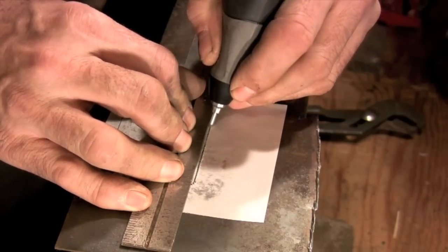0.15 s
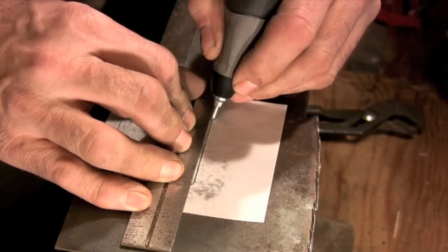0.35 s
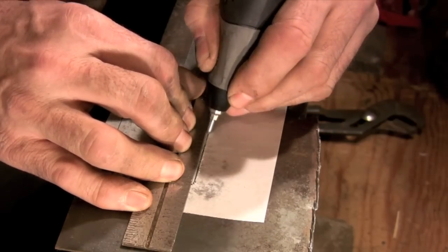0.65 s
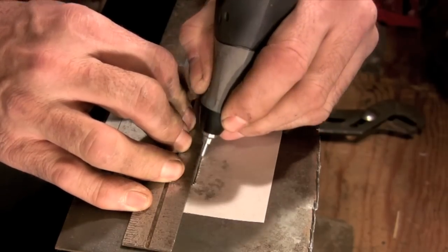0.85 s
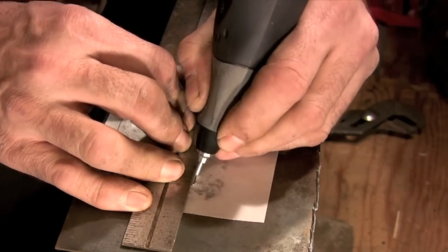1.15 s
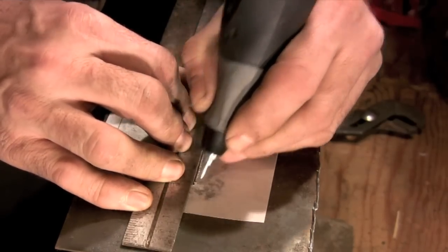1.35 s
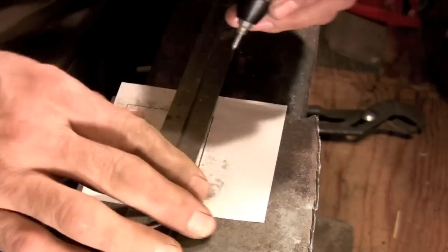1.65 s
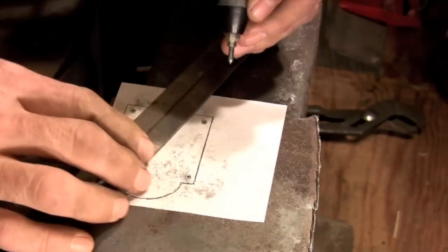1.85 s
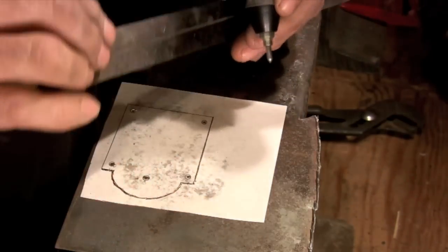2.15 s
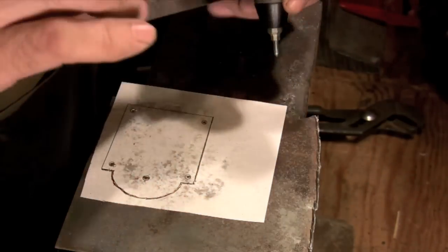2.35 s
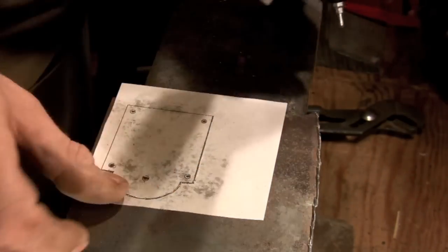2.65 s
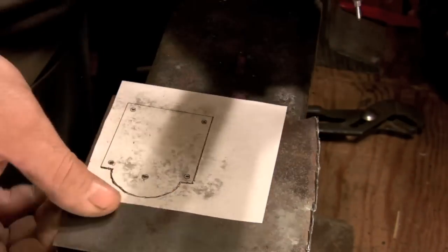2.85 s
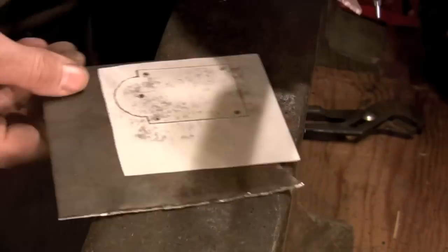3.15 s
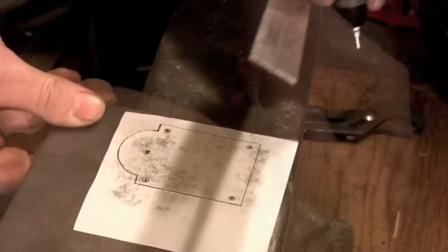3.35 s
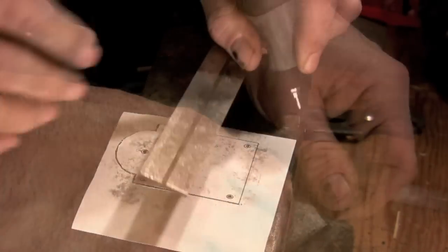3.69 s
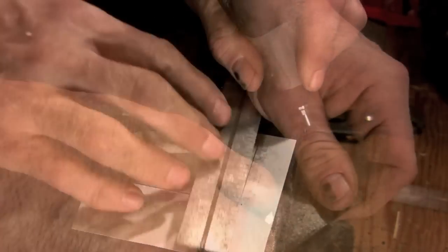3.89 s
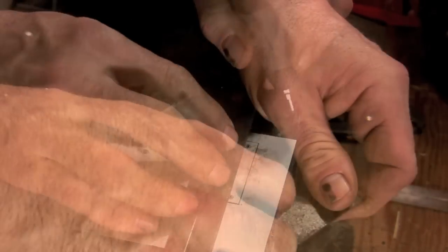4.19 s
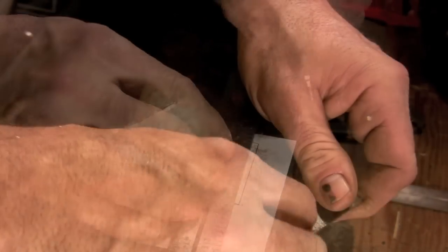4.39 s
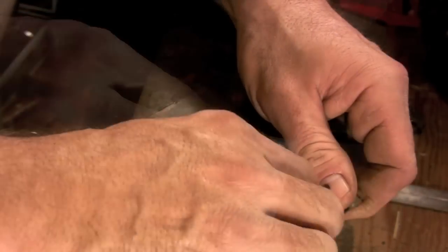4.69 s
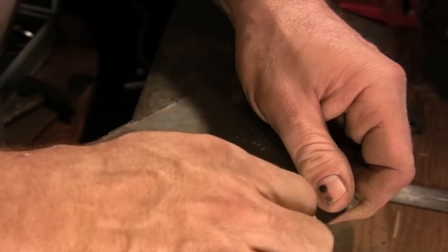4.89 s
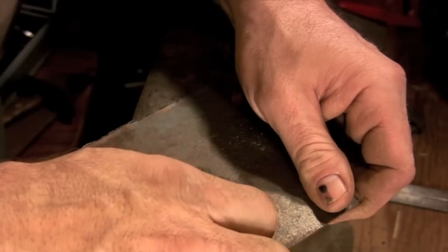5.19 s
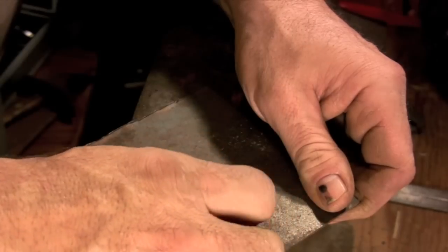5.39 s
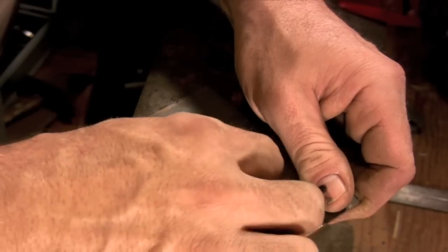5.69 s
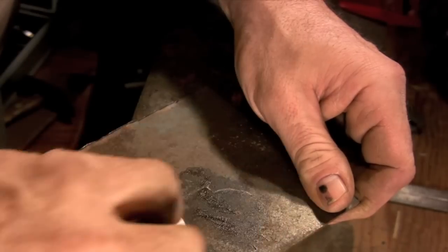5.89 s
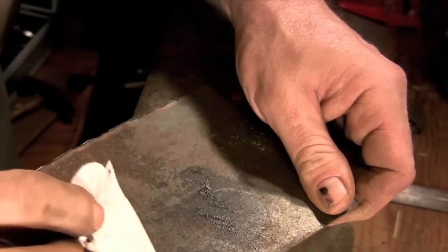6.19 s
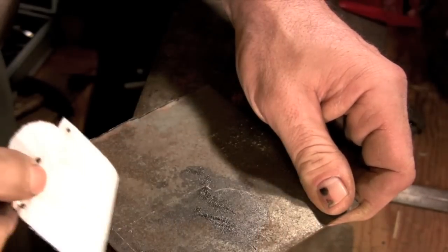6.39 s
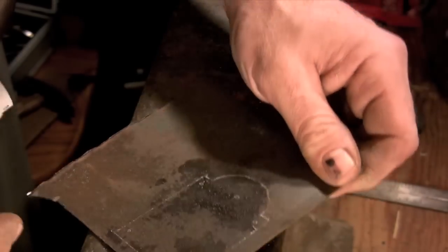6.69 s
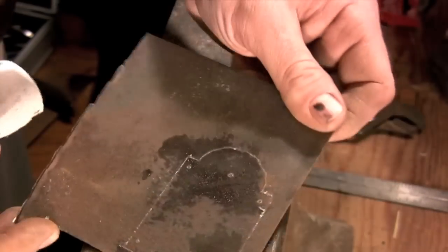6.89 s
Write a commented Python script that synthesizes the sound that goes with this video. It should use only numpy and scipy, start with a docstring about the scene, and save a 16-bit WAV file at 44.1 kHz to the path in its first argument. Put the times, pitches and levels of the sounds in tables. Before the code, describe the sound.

Close, fairly dry workshop sound. From 0 s an electric engraving tool hammers on thin sheet metal, a harsh raspy buzz at about 120 strokes a second, swelling until a bright steel click at 0.6 s. It then bears down harder, shriller and ringing, with a small sheet shift near 0.9 s, until 1.4 s. Lifted, it turns into a looser, fuller rattling buzz with a strong hum, its tone drifting as the grip changes. From about 2.9 s it fades steadily, gone by 5.1 s, while a soft low fan rush swells and stays. A faint touch comes at 3.9 s and a sharp steel click at 4.95 s. In the quiet, light taps follow from 5.4 s, a small clink at 6.0 s, fine papery peeling hiss from 5.8 to 6.4 s and again 6.6 to 6.9 s, with soft knocks. A short gritty metal scrape and tap end it around 7 s.

```python
"""In a workshop, a mains-driven engraving pencil hammers along a steel ruler on thin sheet metal, bears
down, then is lifted and rattles in the air: impulse trains ring metal modes over a hum of their orders.
Its buzz fades as the fan, coloured noise with weak tones, swells to a steady rush. Steel clicks as noise
cracks with ringing sines; a paper template is picked at and peeled off as grainy hiss with light taps.
The sheet shifts under the tip and later scrapes over the bench, uneven noise ringing its modes."""
import sys
import numpy as np
from scipy import signal
from scipy.fft import rfft, irfft, next_fast_len
from scipy.io import wavfile
from scipy.ndimage import uniform_filter1d, map_coordinates

SR = 44100
rng = np.random.default_rng(int(sys.argv[2]) if len(sys.argv) > 2 else 0)


def store_wav(level_fs):
    """Save 16-bit WAV to argv[1]."""
    pcm = np.round(np.clip(np.atleast_2d(level_fs), -1, 1) * 32767)
    wavfile.write(sys.argv[1], SR, pcm.T.astype(np.int16))


N = 310464

STROKE_HZ, FIRST_STROKE_S = 119.986, .0053

# hum of each hold of the tool: (multiple of the stroke rate, level against the clatter [dB])
HUM_TRACING = [(1, -39.5), (2, -26), (3, -27.5), (4, -15.5), (5, -24), (6, -38), (8, -22.5), (9, -40),
               (10, -14), (11, -22), (12, -27), (13, -22), (14, -23), (16, -21), (17, -16), (18, -23),
               (19, -16), (20, -30), (21, -34), (24, -16), (30, -19)]
HUM_BEARING = [(2, -23), (3, -31), (4, -17), (5, -31.5), (6, -20), (8, -9.5), (10, -14.5), (11, -21),
               (12, -20), (13, -14), (14, -17.5), (16, -21.5), (17, -23), (18, -19), (19, -16), (20, -18.5),
               (21, -21.5), (22, -19.5)]
HUM_LIFTED = [(2, -39), (3, -24), (4, -13), (5, -18), (6, -21), (7, -20), (8, -21.5), (9, -19), (10, -15.5),
              (12, -23.5), (13, -18), (15, -24.5), (16, -21.5), (17, -22.5), (18, -24), (19, -31),
              (20, -21.5), (21, -26), (28, -24), (33, -18)]
HUM_RAISED = [(3, -24.5), (4, -15), (5, -17.5), (6, -20.5), (7, -21.5), (8, -24), (9, -28), (10, -17),
              (11, -26), (12, -23), (13, -12.5), (14, -25), (15, -25), (16, -20.5), (17, -17), (18, -24.0),
              (20, -20.5), (21, -32), (24, -27), (25, -32), (26, -20.5), (30, -35), (32, -23), (33, -17),
              (34, -25), (36, -30), (40, -32)]
# tracing, bearing, lifted, raised: (hum table, unsteadiness of its phase [radians per order])
HUMS = {"tracing": (HUM_TRACING, 0.014), "bearing": (HUM_BEARING, 0.026), "lifted": (HUM_LIFTED, 0.042),
        "raised": (HUM_RAISED, 0.041)}
# the grip moves the housing's main resonance and sets its low hum:
# (time [s], centre [Hz], lift before each source's share [dB], low hum [dB])
GRIP = [(0, 1380, 2.5, -4), (.6, 1280, -2, -1.5), (.85, 1250, 6.5, 1), (.92, 1300, 4, 0),
        (1.05, 1450, -2.5, 1.5), (1.28, 1610, 7, 2), (1.43, 1460, 1.5, -1), (1.75, 1410, 5.5, 2.5),
        (2.02, 1170, 1.5, 0.5), (2.25, 1150, 0.5, -0.5), (2.5, 1270, 4.5, 0), (2.849, 1700, 8.5, 2.5),
        (3.2, 1750, 8, 1.5), (3.55, 1830, 7, 1), (3.85, 1300, 6.5, -0.5), (4.9, 1120, 7.5, 1)]
# spectrum of steel cracking on a hard surface: (frequency [Hz], level [dB])
CLICK_COLOUR = [(180, -51), (300, -10), (847, -4), (1450, -8), (2100, 0.5), (2550, -7), (4360, -3.5),
                (5390, -15), (7100, -3), (10500, -8), (14500, -30)]
# modes of the thin sheet: (frequency [Hz], width [Hz], relative level [dB])
SHEET = [(966, 28, 4), (1100, 75, -9), (1380, 36, 7.5), (1670, 24, 6), (2100, 90, -18), (2450, 100, 1.5),
         (2810, 51, 1), (3110, 88, 0.5), (3560, 280, -9), (4440, 120, -4), (5000, 140, -4), (5600, 90, -1),
         (6900, 300, -17), (8100, 210, -10)]
# hands, ruler and paper tapping the sheet: (time [s], relative knock [dB], relative rattle [dB],
# relative tick [dB], mode that the spot favours [Hz], mode level [dB], hard contact level [dB],
# rise [s], nominal decay [s])
TAPS = [(3.903, -28, -41, -52, 606, -32, -40, 0.0047, 0.14),
        (5.406, -36, -36, -41, 3150, -40, -47, 0.019, 0.1),
        (5.51, -65, -52, -48, 3900, -48, -44, 0.0077, 0.11),
        (5.767, -38, -36.5, -37.5, 2250, -44, -29, 0.02, 0.14),
        (5.893, -44, -48, -51, 1500, -46, -40, .003, .05),
        (5.9964, -31.5, -28, -43, 2090, -26, -23, 0.00049, 0.085),
        (6.012, -39, -49, -52, 1400, -37, -39, 0.0018, .13),
        (6.361, -30, -48, -47, 388, -26.5, -30, 0.00068, .035),
        (6.37, -41, -44, -40, 1000, -39, -30, 0.00089, 0.073),
        (6.4009, -27.5, -55, -62, 990, -29, -36, 0.00044, 0.044),
        (6.594, -39, -47, -45, 1300, -50, -39, 0.011, 0.48),
        (6.664, -38, -36, -60, 800, -34, -30, 0.0092, 0.19),
        (6.73, -48, -42, -47, 280, -26, -35, 0.012, .1),
        (7.012, -32.5, -36, -47, 1420, -36, -27.5, 0.0042, 0.044)]


def amp(db):
    """Decibels to gain."""
    return np.exp(np.asarray(db) * np.log(10) / 20)


def unit(x):
    """Scaled to rms 1."""
    return x / np.sqrt(np.mean(x ** 2) + 1e-20)


def clock():
    """The time of each sample, in seconds."""
    return np.arange(N) / SR


def gain(points, hz):
    """Gain of (Hz, dB) points on a log axis, falling away beyond both ends."""
    f, db = np.transpose(points)
    outside = np.minimum(1, hz / f[0]) ** 2 * np.minimum(1, f[-1] / (hz + 1)) ** 2
    return amp(np.interp(np.log(hz + 1), np.log(f), db)) * outside


def curves(rows):
    """One value per sample for each column after the time."""
    s, *cols = np.transpose(rows)
    return [np.interp(clock(), s, c) for c in cols]


def wobble(rate):
    """A smooth random curve, rate knots a second."""
    knots = rng.standard_normal(int(N * rate / SR) + 4)
    coarse = np.linspace(0, N / SR, 2 ** 11)
    return np.interp(clock(), coarse, map_coordinates(knots, [coarse * rate]))


def filtered(x, response):
    """x times a response of frequency."""
    m = next_fast_len(N + SR // 4, True)
    spectrum = rfft(x, m) * response(np.fft.rfftfreq(m, 1 / SR))
    return irfft(spectrum, m)[..., :N]


def coloured(x, points):
    """x shaped by the spectrum of (Hz, dB) points."""
    return filtered(x, lambda hz: gain(points, hz))


def causal(gains):
    """The response with these gains that rings only after the blow (minimum phase)."""
    cepstrum = irfft(np.log(gains + 1e-6))
    half = len(cepstrum) // 2
    fold = np.r_[1, np.full(half - 1, 2), 1, np.zeros(half - 1)]
    return np.exp(rfft(cepstrum * fold))


def resonate(x, table):
    """x rung through (Hz, width, dB) modes of alternating sign, at rms 1."""
    def modes(f):
        total = 0
        for k, (centre, width, db) in enumerate(table):
            damping = 1j * f * width
            total = total + (-1) ** k * amp(db) * damping / (centre ** 2 - f * f + damping)
        return total
    return unit(filtered(x, modes))


def noise():
    """Two unrelated white noises, for mid and side."""
    return rng.standard_normal((2, N))


def stereo(pair, width):
    """Left and right from a mid and a side signal."""
    side = coloured(pair[1], width)
    return np.array([pair[0] + side, pair[0] - side])


def blow(s, rise, t60):
    """An envelope that rises at s and then dies away."""
    age = np.maximum(clock() - s, 0)
    decay = amp(-60 * np.clip(age - rise, 0, 2 * t60) / t60)
    return np.minimum(age / rise, 1) * decay


def swell(start, end, attack, release, db, growth_db):
    """A gesture: it rises, holds while its level changes steadily, and is released after its end."""
    age = clock() - start
    gate = np.clip(age / attack, 0, 1) * np.clip(1 - (clock() - end) / release, 0, 1)
    return gate * amp(db + growth_db * np.clip(age, 0, end - start))


def faded():
    """Progress of the fade from tool to fan, 0 to 1."""
    start_s, end_s = 2.94, 5.13
    return np.clip((clock() - start_s) / (end_s - start_s), 0, 1)


def strokes(contacts, jitter, scatter_db, limp_db):
    """One impulse for each contact of each stroke; the two mains half-waves pull unequally."""
    k = np.arange(int(N / SR * STROKE_HZ))
    train = np.zeros(N + SR)
    for delay, db in contacts:
        slack = rng.standard_normal(len(k)) + wobble(5)[k * N // len(k)]
        at = ((k + delay) / STROKE_HZ + FIRST_STROKE_S + jitter * slack) * SR
        size = amp(db + scatter_db * rng.standard_normal(len(k)) + limp_db * (-1) ** k)
        # a short sinc places each impulse between samples
        cells = at.astype(int)[:, None] + np.arange(-4, 6)
        pulses = size[:, None] * np.sinc(cells - at[:, None])
        train += np.bincount(np.abs(cells).ravel(), pulses.ravel(), N + SR)
    return train[:N]


def clatter(contacts, colour, modes, jitter, scatter_db, crack_t60, tail_db, tail_t60,
            rasp_db, snap_db, turn):
    """Strokes open with a bare snap; contacts crack, ring dense metal modes and scratch puffs of noise."""
    # the irregular rasp, and the ring that repeats: (frequency [Hz], level [dB])
    rasp_colour = [(150, -33), (500, -7), (1000, -6.5), (2000, 0), (4000, -0.5), (10000, 1.5)]
    ring_colour = [(1700, -48), (2500, -2), (5000, -2.5), (12000, 0)]
    train = strokes(contacts, jitter, scatter_db, limp_db=-0.4)
    t = np.arange(SR // 6) / SR
    attack = np.minimum(1, (t + 1 / SR) / .0001)
    decay = attack * np.hypot(amp(-60 * t / crack_t60), amp(tail_db - 60 * t / tail_t60))

    def dense_ring():
        modes_cloud = decay * rng.choice([-1, 1], (2, len(t)))
        return signal.oaconvolve(train[None], modes_cloud, axes=1)[:, :N]

    # the modes change as the tool moves, turn radians a second
    drift = turn * clock() + 0.36 * wobble(2.01)
    ring = unit(dense_ring() * np.cos(drift) + dense_ring() * np.sin(drift))
    # every scratch has new detail but carries the energy of its blow
    energy = np.abs(signal.oaconvolve(train ** 2, decay ** 2)[:N])
    rasp = unit(np.sign(noise()) * np.sqrt(energy))
    first_contacts = unit(strokes(contacts[:1], jitter, scatter_db, limp_db=0))
    snap = -amp(snap_db) * first_contacts * np.array([[1], [0]])  # in the middle only

    def body(f):
        lift_db = sum(db / (1 + (2 * (f - hz) / width) ** 2) for hz, width, db in modes)
        return causal(gain(colour, f) * amp(lift_db))

    mix = coloured(ring + snap, ring_colour) + amp(rasp_db) * coloured(rasp, rasp_colour)
    return unit(filtered(mix, body))


def hum(force, wander_db):
    """Clean orders of the stroke rate follow the force; each hold favours its own orders."""
    # one order swells or dips as the grip tunes the housing:
    # (order, time [s], width [s], change at its middle [dB])
    resonances = [(19, 0.27, .15, 4), (19, 0.97, 0.18, -6), (12, .93, 0.094, 7), (13, 1.2, 0.065, 4),
                  (11, 1.24, 0.13, 4), (10, 2.08, 0.3, 5.5), (17, 2.93, 0.16, 4), (16, 3.35, .25, 3),
                  (10, 3.69, 0.12, 5)]
    free_lag_s, loosen_s = 0.00113, .4  # in the air the housing peaks this long after the blow
    share = force / (force.sum(0) + 1e-6)
    tables = [{round(k): amp(db) for k, db in table} for table, _ in HUMS.values()]
    unsteady = np.array([spread for _, spread in HUMS.values()]) @ share
    free = uniform_filter1d(share[2:].sum(0), int(loosen_s * SR))  # 0 on the sheet, 1 in the air
    phase = 2 * np.pi * STROKE_HZ * (clock() - FIRST_STROKE_S - free_lag_s * free)
    low_gain = amp(curves(GRIP)[-1])
    out = np.zeros(N)
    for k in sorted(set().union(*tables)):
        size = np.array([table.get(k, 0) for table in tables]) @ force
        if k <= 8:
            size = size * low_gain
        tuned_db = sum(db * np.exp(-((clock() - s) / width) ** 2)
                       for order, s, width, db in resonances if round(order) == k)
        wandering_db = wander_db * np.sqrt(k) * wobble(5.035)
        # orders stay loosely in step with the blow
        lag = rng.uniform(-0.65, 1.27) + k * unsteady * wobble(9)
        out += np.sqrt(2) * size * amp(tuned_db + wandering_db) * np.cos(k * phase + lag)
    return out


def gripped(x, share):
    """x through the moving resonance of the housing, with a share of its lift in dB."""
    width_hz = 370
    hz, t, z = signal.stft(x, SR, nperseg=512)
    s, *cols = np.transpose(GRIP)
    centre, lift_db, _ = (np.interp(t, s, c) for c in cols)
    bell = 1 / (1 + (2 * (hz[:, None] - centre) / width_hz) ** 2)
    return signal.istft(z * amp(share * lift_db * bell), nperseg=512)[1][:N]


def singing():
    """Strokes or their rebound ring narrow modes for a while: the pressed sheet, the lifted tool's casing."""
    # (frequency [Hz], width [Hz], delay [cycles], start [s], end [s], attack [s], release [s],
    # level [dB], growth [dB per s])
    modes = [(3150, 110, 0, 0.94, 1.408, 0.3, 0.029, -25, -4),
             (4300, 77, 0.066, 0.76, 0.96, 0.054, .08, -30.5, -4),
             (4770, 110, .45, .98, 1.408, 0.14, 0.022, -25, -5),
             (4330, 180, 0, 1.36, 1.408, .04, 0.032, -27, 0), (4700, 130, 0, 1.46, 1.85, .08, .08, -34, -4),
             (4550, 120, 0, 3.3, 4.9, 0.25, .08, -30, -3.5)]
    out = np.zeros(N)
    for hz, width, delay, *gesture in modes:
        train = strokes([(delay, 0)], jitter=.00003, scatter_db=2, limp_db=.4)
        out += swell(*gesture) * resonate(train, [(hz, width, 0)])
    return out


def engraver():
    """The armature strikes twice per mains cycle: crisp on the sheet, loose and rattling in the air."""
    # how the tool is held: (hold, start [s], end [s], attack [s], release [s], level [dB],
    # growth [dB per s])
    holds = [("bearing", -.05, 0.023, .02, 0.5, -24, 0), ("tracing", -0.032, 0.592, .02, 0.09, -28, 12.3),
             ("bearing", 0.56, 1.408, 0.14, 0.044, -22, 2.7), ("lifted", 1.4, 1.49, .04, 0.11, -22, 0),
             ("lifted", 1.494, 2.45, 0.095, 0.29, -19.5, 0), ("raised", 2.45, 3.39, 0.3, 0.38, -18.5, 0),
             ("lifted", 3.364, 4.98, 0.38, 0.09, -19, 0)]
    # contacts within one stroke: (delay [cycles], relative level [dB])
    tracing_contacts = [(-.012, 0), (.03, -4), (.13, -10), (.28, -10)]
    bearing_contacts = [(-.025, -6), (.04, 6.5), (.47, -0.5), (.58, -8)]
    lifted_contacts = [(.005, -4.5), (.045, -2.5), (.14, -6.5), (.335, -3.5), (.84, -3.5)]
    # colour of the clatter in each hold: (frequency [Hz], level [dB])
    tracing_colour = [(410, -50), (700, -33), (902, -19), (986, -4), (1130, -1), (1180, -11), (1620, -7),
                      (1770, -10), (2220, -4), (2750, -10), (2970, -4.5), (7400, -4), (8410, -3),
                      (11000, -10.5), (14500, -28)]
    bearing_colour = [(700, -21), (1000, -1), (1600, -5.5), (2700, -11), (3300, -6.5), (3800, -5.5),
                      (4600, -3), (5500, -6.5), (6600, -8), (8000, -13), (9700, -13), (12900, -25),
                      (14500, -45)]
    lifted_colour = [(410, -9), (700, -8), (775, -3), (815, -5), (902, -7), (937, -1.5), (1130, -2.5),
                     (1180, -5.5), (1270, -2), (1520, -4), (1660, -4.5), (2750, -7.5), (3830, -3.5),
                     (9910, -9.5), (12500, -18), (14500, -26)]
    # resonances along the ruler, bearing down, and of the tool's own casing:
    # (frequency [Hz], width [Hz], lift [dB])
    ruler_modes = [(2150, 400, 3), (3000, 160, 0), (4850, 260, 3.5), (8250, 250, 3), (9300, 300, 2)]
    pressed_modes = [(2250, 240, 5), (3150, 300, 7.5), (4280, 160, 5), (4800, 280, 2)]
    casing_modes = [(2060, 1600, 2), (3120, 320, 1.5), (3990, 190, 2.5), (4690, 270, 3.5),
                    (5630, 350, -0.5), (6520, 360, 3), (10220, 5200, 5.5)]
    # the loose armature's low flutter: (frequency [Hz], level [dB])
    flutter_colour = [(125, -41), (150, -8), (190, -26), (300, -9.5), (420, -6), (540, 0.5), (680, -15.5),
                      (900, -6.5), (1400, -10)]
    # stereo width of the clatter: (frequency [Hz], side gain [dB])
    rattle_width = [(60, 2), (200, -44), (500, -13), (1300, -15.5), (2500, -89), (4500, -31.5),
                    (6500, -12.5), (8000, -9), (10000, -9.5), (14000, -72)]
    idle_rattle_db = -29  # the casing rattles a little even with the tip on the sheet

    force = np.array([sum(swell(*row) for kind, *row in holds if kind == hold) for hold in HUMS])
    # jitter and decay times in seconds, turn in radians a second
    tracing = clatter(tracing_contacts, tracing_colour, ruler_modes, jitter=.000022, scatter_db=1.5,
                      crack_t60=0.0012, tail_db=-25.5, tail_t60=0.26, rasp_db=5, snap_db=-4, turn=4.5)
    bearing = clatter(bearing_contacts, bearing_colour, pressed_modes, jitter=.00003, scatter_db=2.0,
                      crack_t60=0.0011, tail_db=-19, tail_t60=0.16, rasp_db=-1, snap_db=-13, turn=7.9)
    lifted = clatter(lifted_contacts, lifted_colour, casing_modes, jitter=.000025, scatter_db=1.2,
                     crack_t60=0.0018, tail_db=-19.5, tail_t60=0.19, rasp_db=0.5, snap_db=-10.5,
                     turn=4.476)
    loose = np.maximum(force[2] + force[3], amp(idle_rattle_db))
    metal = force[0] * tracing + force[1] * bearing + loose * lifted
    flutter_level = amp([-28, -24.5, -21.5, -20.5]) @ force  # dB in each hold
    flutter = flutter_level * unit(coloured(noise(), flutter_colour))
    # the clatter gets a smaller share of the grip's lift than the hum
    rattle = np.array([gripped(part, 0.52) for part in metal]) + flutter
    buzz = gripped(hum(force, wander_db=0.52), 0.85)
    return (1 - faded()) * (stereo(rattle, rattle_width) + buzz + singing())


def fan():
    """A workshop fan: low rush, a duct resonance and weak unsteady tones, swelling as the tool fades."""
    # low rush, and the duct's band above it: (frequency [Hz], level [dB])
    low_colour = [(15, -50), (25, -20), (123, -7.5), (183, -9), (234, 0.5), (329, -9.5), (367, -4.5),
                  (415, -17), (469, -10), (515, -13), (712, -18), (857, -40), (1000, -6), (1300, -32),
                  (2200, -120)]
    duct_colour = [(700, -6.5), (950, -5), (1130, 1.5), (1450, -15), (2200, -19), (5000, -22),
                   (10500, -23.5), (14000, -43)]
    # unsteady tones: (frequency [Hz], relative level [dB])
    lines = [(59.2, -61), (118.4, -50), (150.7, -49), (209.9, -57), (360.7, -62)]
    # stereo width: (frequency [Hz], side gain [dB])
    rush_width = [(60, -11), (110, 2.5), (200, -7), (380, -4.5), (690, -4), (1280, -2), (2360, -12.5),
                  (4350, -7), (8030, -1), (14800, 4)]
    faint_db, swelled_db = -57, -41
    low = unit(coloured(noise(), low_colour))
    duct = unit(coloured(noise(), duct_colour))
    rush = amp(-2.5) * low + amp(-8) * duct
    tones = unit(sum(amp(db) * np.sin(2 * np.pi * hz * clock() + 1.5 * wobble(4)) for hz, db in lines))
    level = np.hypot(amp(faint_db), amp(swelled_db) * faded())
    return level * (stereo(rush, rush_width) + amp(-10.5) * tones)


def clicks():
    """Steel snaps against steel, chatters once and rings briefly."""
    # (time [s], relative level [dB])
    snaps = [(0.597, -10), (4.954, -7.5)]
    # ringing modes of the steel: (frequency [Hz], relative level [dB], decay by 60 dB [s])
    steel = [(846, -26, .06), (2170, -8.5, .06), (3640, -9, .12), (4350, -19, .1), (6680, 6, 0.074),
             (7100, -6, 0.13), (7140, 4, .13), (7300, -4, .11), (9300, -15, .12)]
    crack, ring = np.zeros(N), np.zeros((2, N))
    t = np.arange(SR // 4) / SR
    for s, db in snaps:
        chatter = amp(-18.0) * blow(s + 0.0027, 0.0022, 0.015)
        tail = amp(-15.0) * blow(s, 0.0025, 0.23)
        crack += amp(db) * (blow(s, 0.00028, 0.0089) + chatter + tail)
        for hz, level, t60 in steel:
            phase = rng.uniform(0, 2 * np.pi, (2, 1))
            decay = amp(db + level - 22.0 - 60 * t / t60)
            ring[:, round(s * SR):][:, :len(t)] += decay * np.sin(2 * np.pi * hz * t + phase)
    return amp(-4.0) * crack * unit(coloured(noise(), CLICK_COLOUR)) + ring


def scrape():
    """The sheet shifts or drags; small slips ring its strong modes and a dense cloud of weak ones."""
    # first under the tip, later over the bench: (start [s], end [s], attack [s], release [s],
    # relative level [dB], growth [dB per s])
    drags = [(0.86, 0.946, 0.03, .05, -28, 0), (6.9, 6.956, 0.047, .028, -36, 190),
             (6.959, 7.04, 0.024, .05, -33.5, -13)]
    # spectrum of the gritty part: (frequency [Hz], level [dB])
    grit_colour = [(290, -46), (500, -16), (792, -21), (950, 4.5), (1110, -4.5), (1380, -5), (2000, -13),
                   (5420, -14.5), (10600, -20), (12900, -49), (14000, -111)]
    grains = noise() * amp(2.5 * rng.standard_normal(N))
    slips = unit(grains) * sum(swell(*row) for row in drags) * amp(2.1 * wobble(220))
    t = np.arange(SR // 4) / SR
    weak_modes = amp(-60 * t / 0.052) * rng.standard_normal((2, len(t)))
    cloud = signal.oaconvolve(slips, weak_modes, axes=1)[:, :N]
    grit = unit(coloured(unit(cloud) + amp(-7.0) * unit(slips), grit_colour))
    return np.std(slips) * (amp(-2) * resonate(slips, SHEET) + amp(-1.8) * grit)


def taps():
    """Touches knock the bench, rattle the damped sheet, ring a mode and tick the paper; the room answers."""
    # spectra of knock, rattle and tick: (frequency [Hz], level [dB])
    knock_colour = [(120, -13), (280, -2), (600, -1.5), (1100, -11), (2200, -16)]
    rattle_colour = [(500, -29), (1000, -2), (2100, 0), (3300, -4), (5500, -22)]
    tick_colour = [(2000, -13), (4500, 4), (10000, -2.5), (12500, -14), (15000, -36)]
    mode_t60_s = 0.047
    # each touch, plus the room's slower answer
    shapes = np.array([blow(s, rise, 0.77 * decay) + amp(-7.5) * blow(s, rise + 0.0059, 0.26)
                       for s, *_, rise, decay in TAPS])
    knock, rattle, tick = amp(np.array(TAPS)[:, 1:4]).T @ shapes
    # the sheet shudders on the bench in quick uneven contacts
    contacts = unit(noise() * amp(3.5 * wobble(260)))
    metal = unit(unit(coloured(contacts, rattle_colour)) + amp(-6) * resonate(contacts, SHEET))
    crackle = unit(coloured(noise() * amp(4.0 * wobble(140)), tick_colour))
    thud = unit(coloured(noise(), knock_colour))
    ring = sum(amp(db) * blow(s, rise, mode_t60_s) * np.sin(2 * np.pi * hz * (clock() - s))
               for s, *_, hz, db, _, rise, _ in TAPS)
    return amp(-4.5) * (knock * thud + rattle * metal + tick * crackle) + ring


def clinks():
    """At the top of each tap the sheet's edge meets the bench: a short crack that rings its modes."""
    envelope = sum(amp(db) * blow(s + rise, 0.00011, 0.0029) for s, *_, db, rise, _ in TAPS)
    crack = envelope * unit(coloured(noise(), CLICK_COLOUR))
    return crack + amp(-5) * np.std(crack) * resonate(crack, SHEET)


def paper():
    """The template peels and slides: a fine hiss of tiny uneven catches."""
    # (start [s], end [s], attack [s], release [s], level [dB], growth [dB per s])
    slides = [(5.82, 6.39, .07, 0.036, -54, 15), (6.568, 6.82, 0.025, .04, -57, 15),
              (6.832, 6.87, 0.028, 0.059, -44.5, 0)]
    # spectrum of the hiss: (frequency [Hz], level [dB])
    hiss_colour = [(880, -54), (1500, -11), (2080, -9), (2460, -12), (3230, -7), (4440, -9), (9820, -5),
                   (14000, -26)]
    grains = noise() * amp(4.2 * rng.standard_normal(N) + 2.9 * wobble(130))
    return sum(swell(*row) for row in slides) * unit(coloured(grains, hiss_colour))


def scene():
    """The tool, the handling of the sheet, and the fan a little to the left."""
    # stereo width of the handling: (frequency [Hz], side gain [dB])
    handling_width = [(200, -16), (1000, -21), (2500, -25), (5000, -13), (9000, -5), (14000, -6)]
    handling = stereo(clicks() + scrape() + taps() + clinks() + paper(), handling_width)
    return engraver() + amp([[0.5], [-0.5]]) * fan() + handling


def record(dry):
    """Soft saturation rounds off the hardest peaks; nothing is kept above the band limit."""
    ceiling, top_hz = .76, 14700
    rounded = dry / (1 + np.abs(dry / ceiling) ** 5) ** (1 / 5)
    return filtered(rounded, lambda hz: hz < top_hz)


dry = scene()
out = record(dry)
store_wav(out)
```